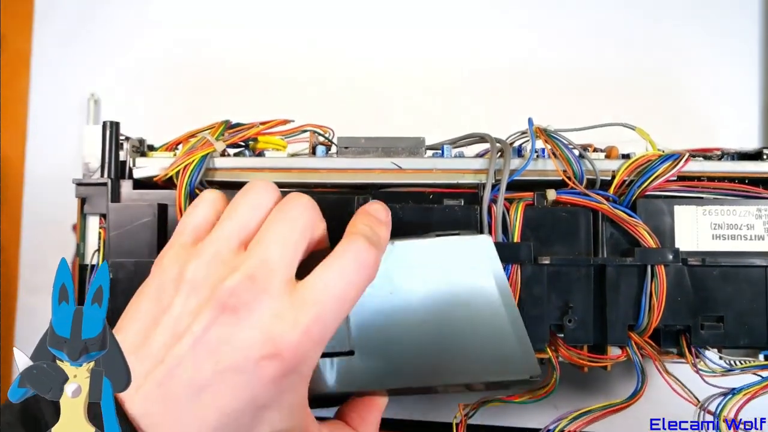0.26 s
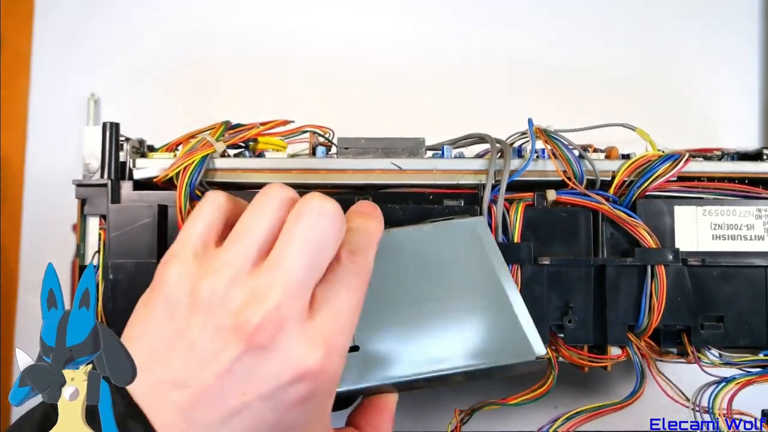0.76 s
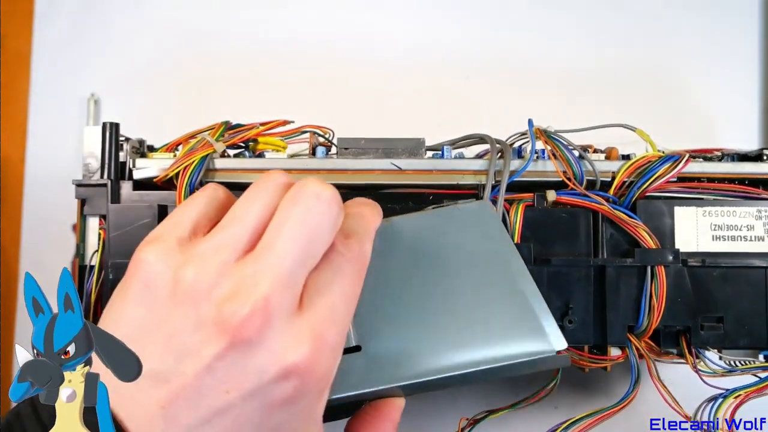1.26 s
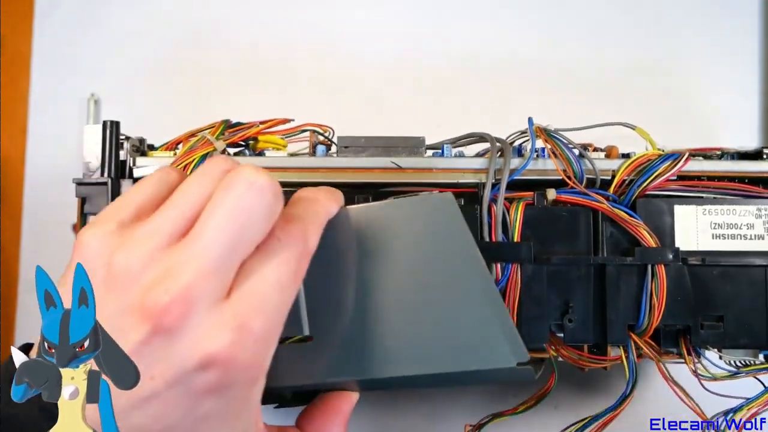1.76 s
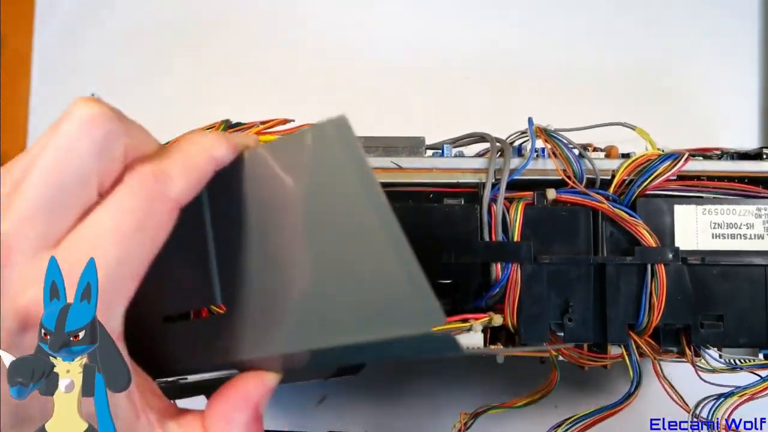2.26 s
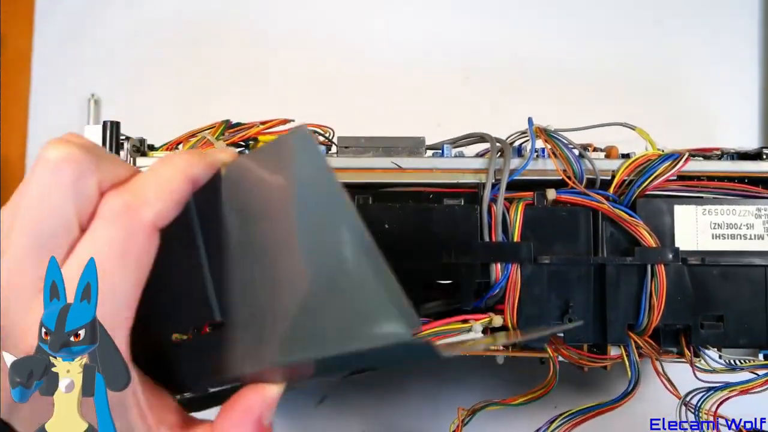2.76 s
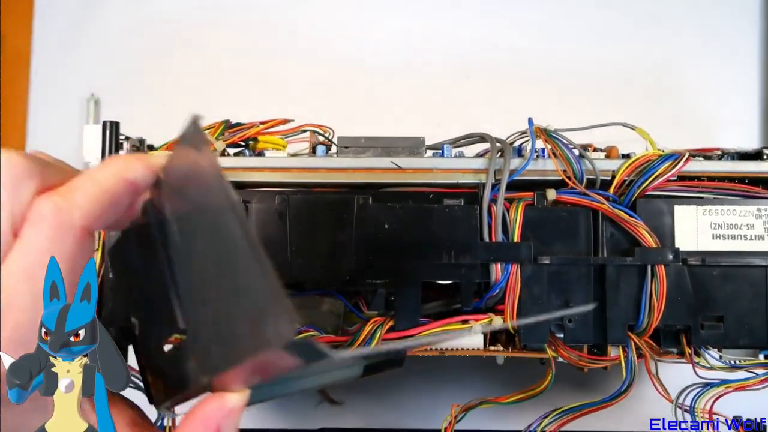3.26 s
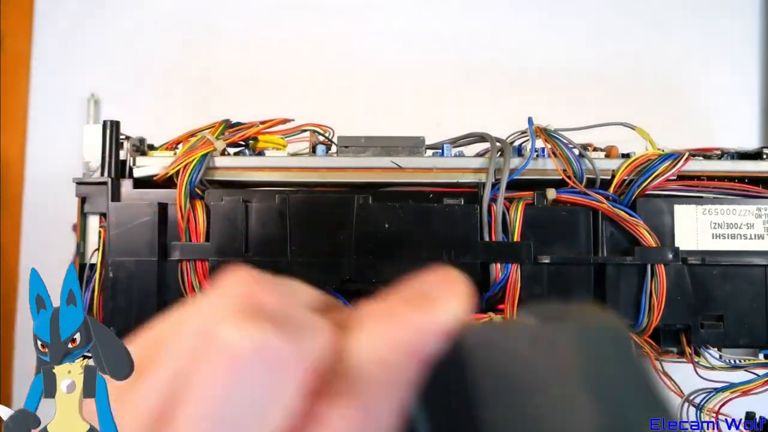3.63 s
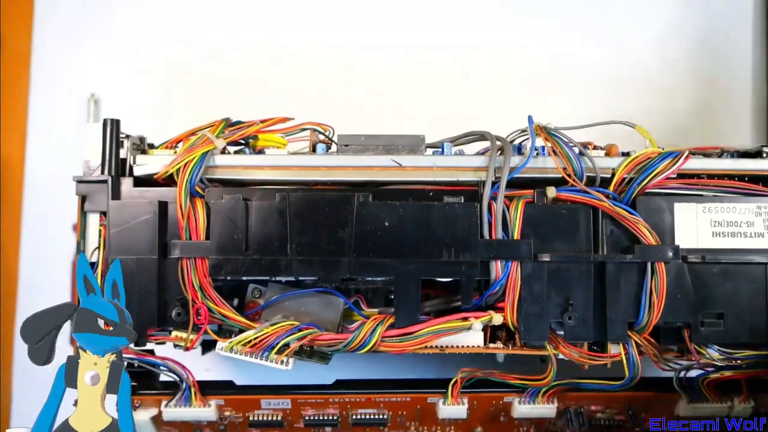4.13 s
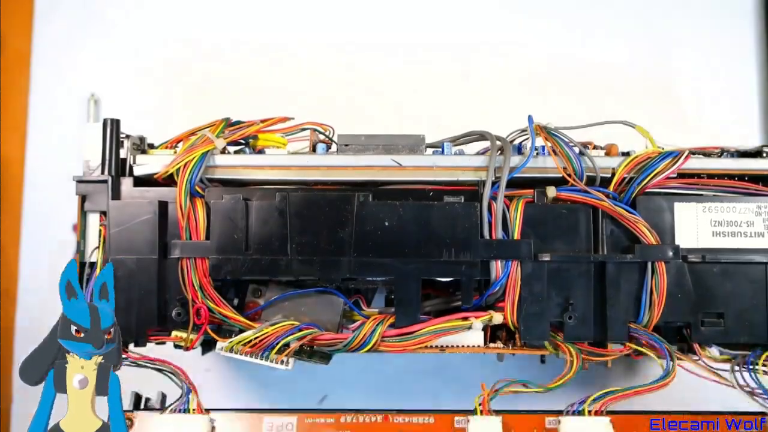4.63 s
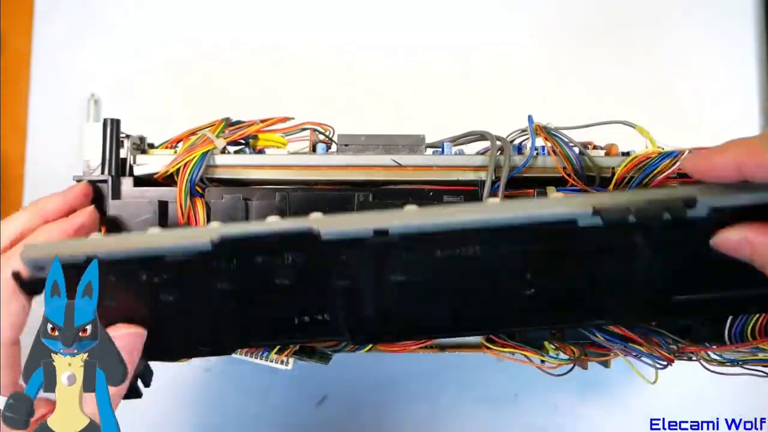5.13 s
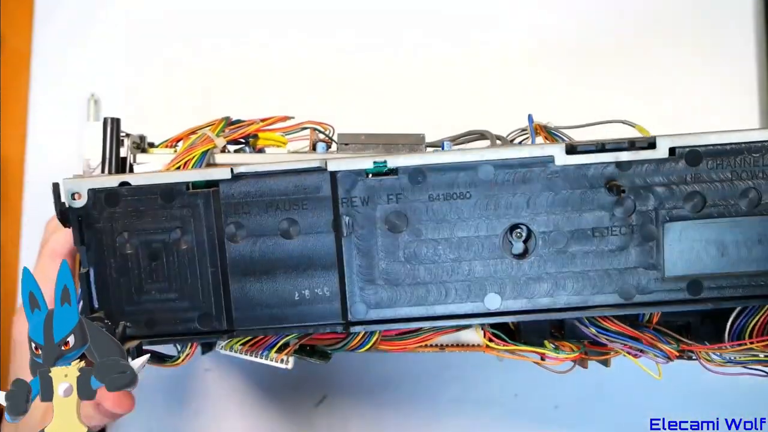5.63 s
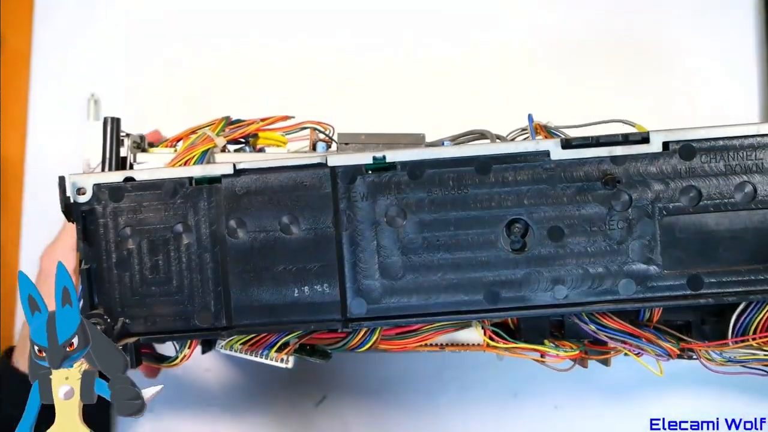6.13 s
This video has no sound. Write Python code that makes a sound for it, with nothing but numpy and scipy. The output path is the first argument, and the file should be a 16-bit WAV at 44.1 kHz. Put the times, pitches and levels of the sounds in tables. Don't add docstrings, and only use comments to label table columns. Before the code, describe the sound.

Hollow plastic knocks, clicks and rattles as a sheet-metal cover is worked loose, then a loud scraping clatter on a table and lighter handling.

```python
import sys
import numpy as np
from scipy import signal
from scipy.fft import rfft, irfft, next_fast_len
from scipy.io import wavfile
from scipy.ndimage import uniform_filter1d

SR = 44100
rng = np.random.default_rng(int(sys.argv[2]) if len(sys.argv) > 2 else 0)


def output_pcm(signal):
    pcm = np.clip(np.atleast_2d(signal).T, -1, 1) * 32767
    wavfile.write(sys.argv[1], SR, np.round(pcm).astype(np.int16))


def attenuation_scalar(level_db):
    decades = np.asarray(level_db, float) / 20
    return 10 ** decades


N = 281754

# hz, level_db_per_hz
HUSH_COLOUR = [(18, -28.5), (30, 7.5), (287, -3), (328, -2), (384, -4), (554, -6), (684, -7.5), (937, -2.5),
               (1810, -13.5), (2120, -10), (3060, -13.5), (4700, -16), (6000, -22), (16000, -40)]
HUSH_DB = -65
# hz, t60_s
ROOM_T60 = [(100, 0.51), (500, 0.2), (2000, 0.13), (6000, 0.12), (14000, 0.16)]
# hz, scatter_rad
SPREAD = [(100, 0.24), (300, 0.1), (700, 0.2), (2000, 1.19), (5000, 0.68), (10000, 0.58)]
# hz, likeness_0_to_1
SAME = [(100, 0.69), (400, 1), (1000, 0.99), (2500, 0.27), (5000, 0.11), (8000, 0.88), (14000, 0.72)]
# time_s, left_lag_samples
LAG = [
    (0, -2.5),
    (3.4, -3.5),
    (3.9, 11.5),
    (6.39, 4),
]
# time_s, left_over_right_db
LEAN = [
    (0, 0),
    (.6, 0.5),
    (3.3, 1.2),
    (3.6, 0),
]
SHUT_AT_S = [1.085, 1.33, 2.125, 2.315, 2.6, 3.2, 3.362, 3.648, 3.98, 5.33, 5.718, 6.282]
OPEN_AT_S = [1.118, 1.468, 2.186, 2.348, 2.632, 3.23, 3.522, 3.89, 4.01, 5.421, 6.089, 6.374]
GATE_DB = 14.5

# hz, width_hz, level_db
TABLE_MODES = [(55.1, 11, 3), (112, 54, -1.5), (174, 29, -5.5), (211, 15, -8.5), (269, 7.1, -9)]
# start_s, peak_db, low_mode_hz
THUMPS = [(0.027, -30.5, 101), (0.203, -18, 58.6), (.414, -18.5, 196), (.549, -16.5, 270),
          (0.765, -17, 190), (.899, -25.5, 114), (1.469, -36, 279), (1.661, -29, 85), (2.183, -26.5, 99),
          (2.639, -31.5, 89), (2.892, -25, 61.5), (3.02, -23, 174.5), (3.235, -28, 182),
          (3.523, -30.5, 114.5), (4.047, -7.5, 281), (4.088, -12, 340), (4.199, -14, 212),
          (4.233, -15, 400), (4.284, -15, 400), (4.3, -21, 283), (4.449, -21, 280), (5.172, -22.5, 275),
          (5.21, -33.5, 56.3), (5.538, -30, 115.3), (6.093, -34.5, 92), (6.377, -29.5, 118),
          (1.901, -34, 55), (3.895, -35.5, 60), (5.425, -31, 55), (6.17, -39, 151)]

# start_s, hardest_s, end_s, pressure_db, brightness_db
RUBS = [(0., 0.458, 0.8, -41.5, -10.5), (.7, 0.93, 1.08, -35, -11), (1.121, 1.15, 1.52, -38.5, -15),
        (1.47, 1.684, 4.4, -41.5, -11), (2.34, 2.443, 2.57, -38, -12), (2.639, 2.86, 3.3, -43, -11),
        (4.36, 4.44, 4.61, -33.5, -9), (4.685, 5.045, 5.2, -41, -11), (5.2, 5.29, 5.405, -48, -3.5),
        (5.41, 5.496, 5.74, -49, -13), (5.74, 5.78, 6.085, -52, -8), (6.09, 6.2, 6.6, -48, -9.5)]
# hz, level_db_per_hz
RUB_COLOUR = [(150, -43.5), (250, -21.5), (348, -10), (547, -14.5), (1010, -3), (1160, -9.5), (1400, -7.5),
              (5000, -27), (9000, -35.5), (12500, -43.5), (16000, -54)]
RUB_RISE_DB, RUB_FADE_DB, RUB_RUMBLE_DB = -0.5, -17, -10
# time_s, pressure_db, brightness_db
DRAG = [
    (4.008, -16.5, -18),
    (4.045, -14.5, -10.5),
    (4.09, -14.5, -10),
    (4.136, -12, -24),
    (4.182, -16.5, -2),
    (4.27, -14, -13),
    (4.312, -21.5, -7.5),
    (4.352, -31, 1.5),
    (4.4, -50, -13),
]
# hz, level_db_per_hz
DRAG_COLOUR = [(88, -40.5), (150, -19), (348, 0), (504, -8), (730, -8), (2100, -12), (4000, -19),
               (5790, -26), (8730, -34), (13200, -48.5), (16000, -57.5)]
DRAG_RUMBLE_DB = -15

# struck_s, hz, level_db, t60_s
COVER = [(2.996, 1972, -22.5, 0.25), (3.05, 319, -34.5, 0.45), (3.07, 2283, -36, 0.43),
         (3.07, 2196, -36, 0.22), (3.06, 448, -39, 0.33), (3.232, 2180, -44.5, 0.39),
         (3.232, 2335, -33, .3), (3.232, 1980, -34, .15), (3.232, 2767, -44, 0.42), (3.231, 2760, -31, 0.2),
         (3.232, 2227, -41, 0.4), (3.232, 325, -34, 0.43), (3.233, 430, -43.5, 0.43),
         (3.896, 346.4, -31, 0.2), (3.896, 449, -31.5, 0.26), (3.896, 717, -40, 0.19),
         (5.6, 2170, -57, 2.5), (4.3, 342.7, -24, 0.45), (4.33, 682, -30, .5), (4.448, 347, -35, 1.34),
         (5.22, 5780, -51, 0.57), (5.199, 3350, -45, 0.55), (5.43, 5700, -52, 0.6)]
# struck_s, hz, level_db, t60_s
PANELS = [(.023, 2550, -19, 0.03), (.023, 1380, -19.5, 0.058), (.085, 3430, -25.5, 0.029),
          (.163, 2910, -30, 0.043), (.208, 1567, -9, 0.038), (.237, 4550, -22, .03), (.283, 2000, -24, .05),
          (.286, 4070, -23, 0.026), (.793, 554, -13, 0.095), (1.12, 468, -12.5, 0.038),
          (1.12, 1060, -6, 0.03), (1.155, 1250, -29, 0.03), (1.47, 1009, -7.5, 0.037),
          (1.47, 1487, -10, 0.059), (1.472, 2012, -15, 0.065), (2.938, 771, -21.5, 0.11),
          (2.94, 2170, -23.5, 0.053), (3.052, 3550, -23.5, .08), (3.072, 3350, -31, 0.054),
          (3.025, 3490, -24, .05), (4.448, 352, -4.5, .04), (4.176, 3440, -16.5, .03),
          (4.306, 5100, -20.5, 0.11), (4.045, 8710, -15.5, 0.049), (.77, 3240, -18.5, .04),
          (.77, 6300, -24, .05), (.77, 7900, -26, .03), (.792, 3200, -18, .04), (.792, 6270, -20, .12),
          (.792, 5210, -24, .1), (.84, 2050, -29.5, .15), (3.07, 6590, -34, .15), (3.07, 6890, -33.5, .15),
          (3.075, 5448, -40.5, .14), (3.075, 7359, -41, .2), (2.94, 4530, -24, .08), (3.0, 4500, -24, .08),
          (4.9, 4560, -41, .04), (.68, 950, -32, .04), (3.028, 3930, -29, .08), (4.043, 4050, -22.5, .15),
          (4.306, 4095, -18, .1), (4.306, 6445, -27.5, .15), (3.24, 6700, -44, .15)]
FUZZ = 0.89

# start_s, catch_peak_db, pitch_hz, crack_db, slip_peak_db
SLIPS = [(1.12, -10, 1140, -10.5, -23), (1.47, -4.5, 1028, -12.5, -4), (1.721, -17.5, 1014, -12, -15),
         (1.768, -16, 980, -10.5, -12.5), (1.852, -23, 1020, -23, -21.5), (2.387, -21.5, 1030, -20, -25),
         (2.413, -19, 980, -19, -27), (2.444, -15, 987, -12, -13), (2.483, -24.5, 1060, -22, -24),
         (2.656, -25, 896, -13, -21), (2.939, -13.5, 915, -15.5, -12.5), (4.448, -14.5, 603, -34, -30),
         (4.553, -16, 980, -20, -26), (4.688, -24, 900, -19, -21), (4.766, -21.5, 987, -6, -17.5),
         (4.8, -26.5, 905, -45, -20.5), (4.859, -26.5, 1010, -30, -30), (4.899, -28, 985, -16, -18),
         (5.041, -16.5, 888, -11.5, -14.5), (5.102, -18, 922, -5, -10), (5.129, -17, 986, -13.5, -17),
         (5.441, -22.5, 1245, -18, -14.5), (5.602, -30, 1145, -23, -9.5), (6.167, -24.5, 2250, -21.5, -15)]
# start_s, peak_db, crack_db
TAPS = [(.051, -21, -19), (0.0843, -16, -13.5), (0.433, -16, -17), (.713, -15, -23), (1.01, -23.5, -25),
        (1.179, -20.5, -16.5), (1.506, -15.5, -17), (1.629, -22, -16), (1.95, -17, -19),
        (2.008, -24, -13.5), (2.187, -18, -23), (2.2, -24.5, -25), (2.349, -22.5, -23), (4.839, -25, -41.5),
        (4.955, -25.5, -7.5), (6.234, -36, -9)]
HOLLOW_HZ = 956
# start_s, peak_db, main_mode_hz, crack_db
KNOCKS = [(.022, -12, 1390, -18.5), (.235, -9.5, 492, -25), (.364, -5, 1060, -24.5),
          (.415, -13, 504, -21.5), (.792, 2.5, 1728, -20), (.805, -9, 559, -36), (.968, -16.5, 1105, -19),
          (1.154, -25, 430, -17), (1.662, -10, 1703, -25), (2.114, -60, 2716, -24),
          (2.633, -22.5, 350, -17), (2.704, -27.5, 1270, 10), (2.869, -19, 1340, -32.5),
          (3.024, -8, 3000, -4.5), (3.072, -12.5, 1200, 1), (4.014, -11, 354, -20.5),
          (4.14, -6.5, 3410, -6.5), (4.176, -4, 716, -21.5), (4.415, -9, 770, -17.5),
          (5.158, -21.5, 1510, -12), (5.181, -13.5, 890, -29.5), (5.428, -22, 1080, -32),
          (6.091, -23, 570, -15.5), (6.287, -39, 845, -27), (6.377, -25.5, 1740, -25)]
# start_s, peak_db, main_mode_hz, crack_db
CLATTERS = [(.284, -20, 1930, -14.5), (.5, -22.5, 1250, -18), (.736, -13, 1130, -21.5),
            (.771, -7.5, 1060, -16), (1.231, -26.5, 404, -36), (1.885, -19, 1355, -22.5),
            (3.053, -13, 3330, -4.5), (3.231, -14.5, 1144, -0.5), (3.894, -24, 703, -18.5),
            (4.044, -3, 446, -11), (4.305, -3, 1277, -13), (4.494, -19, 793, -11), (5.079, -19, 830, -14),
            (5.53, -19, 890, -15)]
# start_s, peak_db, main_mode_hz, crack_db
SCUFFS = [(.108, -30, 1104, -28), (.135, -38, 1090, -27), (.19, -24.5, 1200, -27.5), (.203, -5, 980, -14),
          (.3, -24.5, 2040, -9), (.32, -28.5, 2060, -12.5), (.476, -23.5, 533, -15.5),
          (.52, -20, 1243, -15.5), (.546, -13.5, 1160, -27.5), (.659, -31, 955, -27),
          (.703, -21.5, 910, -22.5), (.755, -14.5, 1092, -17.5), (.887, -15, 667, -16),
          (.91, -11.5, 446, -27), (1.042, -32.5, 1060, -24), (2.374, -27.5, 1010, -17),
          (2.398, -24.5, 1026, -16), (2.425, -24, 985, -15), (2.457, -20, 1074, -16.5),
          (2.68, -31, 940, -27), (2.768, -31.5, 1010, -12), (2.78, -23, 957, -12.5), (2.84, -31, 956, -24),
          (2.903, -26.5, 1000, -17), (2.965, -14.5, 880, -14.5), (4.19, -8.5, 715, -9.5),
          (4.215, -5.5, 509, -23.5), (4.28, -10, 441, -15), (4.325, -9, 1306, -17.5),
          (4.435, -19, 715, -17), (4.503, -18, 878, -29.5), (5.42, -24, 1030, -22),
          (2.992, -10, 1500, -11.5), (.765, -5, 1199, -23)]
# start_s, peak_db, main_mode_hz, crack_db
SNAPS = [(.022, -12.5, 2530, -16), (.363, -8.5, 4600, -10.5), (1.12, -3.5, 2130, -14),
         (1.487, -10, 5150, -6.5), (4.011, -4, 1223, -14), (4.141, -3, 3180, -10.5), (4.182, -5, 1220, -21),
         (4.306, -8, 4320, -6), (2.45, -18.5, 2110, -9), (2.871, -18.5, 2030, -32),
         (.208, -6.5, 4650, -9.5), (.549, -9, 1200, -18), (.704, -29.5, 7070, -8.5), (.77, -7.5, 3140, -9),
         (.792, -7.5, 6310, -8.5), (.892, -12.5, 3497, -9), (2.94, -15.5, 4490, -17.5),
         (4.145, -13, 8000, -6), (4.176, -9.5, 4100, -11.5), (4.436, -19, 4500, -13),
         (4.765, -22.5, 3170, -5.5), (5.046, -15, 4020, -9.5), (5.13, -18.5, 2850, -17),
         (5.537, -23, 3450, -19), (4.722, -36, 2840, -12)]
KNOCK_MS, CLATTER_MS, TAP_MS = 7.93, 15, 7.4
SLIP_MS, SCUFF_MS, SNAP_MS = 8.4, 8.7, 1.5
SLIP_CLICK_DB, SCUFF_CLICK_DB = -9.5, -26.5
HARD_RISE, SLIP_RISE, SCUFF_RISE = 0.28, 0.47, 0.94
# hz, level_db_per_hz
KNOCK_COLOUR = [(120, -35), (200, -2.5), (538, -2.5), (683, -5.5), (1020, -2.5), (1560, -4.5), (1770, -5),
                (2750, -6), (3130, -7.5), (5840, -15.5), (6280, -15.5), (15100, -36), (16000, -54)]
# hz, width_hz, level_db
CHASSIS_MODES = [(636, 13, -2.5), (1060, 660, 1.5), (1270, 41, 3.5), (1780, 91, -1.5), (2850, 46, -8.5),
                 (4720, 230, -2.5), (5100, 20, -8.5), (7230, 200, -13)]
CRACK_S, CRACK_LEFT = .006, .45


def evened(x):
    return x / np.sqrt(np.mean(x ** 2) + 1e-20)


def read(points, hz):
    f, value = np.transpose(points)
    return np.interp(np.log(hz + 1), np.log(f + 1), value)


def mode(hz, centre_hz, width_hz):
    return 1j * hz * width_hz / (centre_hz ** 2 - hz ** 2 + 1j * hz * width_hz)


def lagged(hz, samples):
    return np.exp(-2j * np.pi * hz * samples / SR / (1 + (hz / 4500) ** 4))


def placed(starts_s, sounds):
    out = np.zeros((2, N))
    for start_s, sound in zip(starts_s.ravel(), sounds.transpose(1, 0, 2)):
        part = out[:, max(round(start_s * SR), 0):][:, :sound.shape[1]]
        part += sound[:, :part.shape[1]]
    return out


def hush():
    frames, hz = N // 256 + 5, np.fft.rfftfreq(1024, 1 / SR)
    a, b, c, d, patches = rng.standard_normal((frames, 513, 5)).T
    patches = evened(uniform_filter1d(uniform_filter1d(patches, 4, 0), 40, 1))
    shared, own = a + 1j * b, c + 1j * d
    z = np.array([shared, 0.99 * shared + 1.04 * own])
    z *= attenuation_scalar(read(HUSH_COLOUR, hz)[:, None] + 2.2 * patches)
    noise = signal.istft(z, nperseg=1024, noverlap=768)[1][:, :N]
    return attenuation_scalar(HUSH_DB + GATE_DB) * evened(noise)


def room(x):
    taps = np.zeros((2, SR // 2))
    at = np.arange(100, SR // 2 - 20, 20)
    at = at + rng.integers(0, 20, (2, len(at)))
    np.put_along_axis(taps, at, rng.choice([-1., 1.], at.shape), 1)
    hz, t, z = signal.stft(taps, SR, nperseg=256)
    same = np.clip(read(SAME, hz) - .15, 0, 1)[:, None]
    z = np.array([z[0], same * z[0] + np.sqrt(1 - same ** 2) * z[1]])
    decay = attenuation_scalar(-60 * t / read(ROOM_T60, hz)[:, None])
    tail = signal.istft(z * decay, SR, nperseg=256)[1]
    return signal.fftconvolve(x, tail / np.linalg.norm(tail[0]), axes=1)[:, :N]


def thumps():
    start_s, db, low_hz = np.transpose(THUMPS)[:, :, None]
    size = 16384
    t, hz = np.arange(size) / SR, np.fft.rfftfreq(size, 1 / SR)
    uneven_db = 3.0 * rng.standard_normal((len(start_s), len(TABLE_MODES)))
    push = rfft(np.exp(-t / 0.0017) * (1 - np.exp(-t / 0.00057)))
    ring = mode(hz, low_hz, 0.22 * low_hz + 8)
    for k, (mode_hz, width_hz, mode_db) in enumerate(TABLE_MODES):
        ring = ring + attenuation_scalar(mode_db - 7.5 + uneven_db[:, k, None]) * mode(hz, mode_hz, width_hz)
    left = attenuation_scalar(-9.0 / (1 + (hz / 70) ** 2))
    sound = irfft(push * ring * np.array([left, np.ones_like(left)])[:, None])
    sound = attenuation_scalar(db) * sound / abs(sound[1]).max(1, keepdims=True)
    return placed(start_s, sound[:, :, :9000])


def ports(mono, scatter):
    hz, t, z = signal.stft(mono, SR, nperseg=256)
    drift = rng.standard_normal(z.shape)
    drift = evened(uniform_filter1d(uniform_filter1d(drift, 4, 0), 9, 1))
    turn = np.exp(.5j * scatter * read(SPREAD, hz)[:, None] * drift)
    left = z * turn * lagged(hz[:, None], np.interp(t, *np.transpose(LAG)))
    return signal.istft(np.array([left, z / turn]), SR, nperseg=256)[1][:, :len(mono)]


def stroke(start_s, hardest_s, end_s, db, bright_db):
    eases = ((start_s, RUB_RISE_DB), (hardest_s, 0), (end_s, RUB_FADE_DB))
    return [(s, db + ease_db, bright_db, RUB_RUMBLE_DB) for s, ease_db in eases]


def friction(strokes, colour, slips_per_s, spread_db, smooth, clump_db, body_modes):
    rows = []
    for points in map(np.array, strokes):
        first_s, _, first_bright_db, first_rumble_db = points[0]
        last_s, _, last_bright_db, last_rumble_db = points[-1]
        rows.append((first_s, -95.0, first_bright_db + 3.0, first_rumble_db - 4.0))
        rows.extend(points)
        rows.append((last_s, -95.5, last_bright_db + 10.5, last_rumble_db - 5.0))
    rows = np.array(rows)
    t = np.arange(N) / SR
    db, bright_db, rumble_db = (np.interp(t, rows[:, 0], column) for column in rows[:, 1:].T)

    clumps = attenuation_scalar(clump_db * evened(uniform_filter1d(rng.standard_normal(N), 500)))
    sizes = attenuation_scalar(spread_db * np.minimum(rng.exponential(1, N), 4))
    grains = sizes * (rng.random(N) < slips_per_s / SR) * rng.choice([-1, 1], N)
    size = next_fast_len(N)
    z = rfft((evened(grains) + smooth * rng.standard_normal(N)) * clumps, size)

    hz = np.fft.rfftfreq(size, 1 / SR)
    high = 1 / (1 + (3000 / (hz + 1)) ** 6)
    tint = attenuation_scalar(read(colour, hz))
    low = tint * (1 - high) * (1 + sum(attenuation_scalar(g) * mode(hz, f, w) for f, w, g in body_modes))
    rumble = sum(attenuation_scalar(g) * mode(hz, f, w) for f, w, g in TABLE_MODES)
    low, high, rumble = (evened(irfft(z * part, size)[:N]) for part in (low, tint * high, rumble))
    return attenuation_scalar(db) * (low + attenuation_scalar(bright_db) * high + attenuation_scalar(rumble_db) * rumble)


def rubbing():
    rub = friction([stroke(*row) for row in RUBS], RUB_COLOUR, slips_per_s=1500, spread_db=3.4,
                   smooth=1.0, clump_db=1.8, body_modes=[(920, 120, -7), (2050, 140, -3.5)])
    drag = friction([[(*row, DRAG_RUMBLE_DB) for row in DRAG]], DRAG_COLOUR, slips_per_s=600, spread_db=4.0,
                    smooth=0.5, clump_db=1.0,
                    body_modes=[(353, 47, -13.0), (1250, 110, 3.5), (980, 40, -6.5), (750, 110, -4.5)])
    return ports(rub + drag, 1.5) * attenuation_scalar(np.array([[-1.2], [1.2]]))


def ringing_modes(rows, size):
    struck_s, hz, db, t60_s = np.transpose(rows)[:, :, None]
    t = np.arange(size) / SR
    beat_phase, phase, apart = 2 * np.pi * rng.random((len(struck_s), 3)).T[:, :, None]
    decay = attenuation_scalar(db - 60 * t / t60_s) * (1 - np.exp(-t / 0.0012))
    flutter = rng.standard_normal((len(struck_s), size))
    flutter = evened(uniform_filter1d(uniform_filter1d(flutter, 150, 1), 150, 1))
    share = FUZZ / (1 + (3800 / hz) ** 8)
    beat = 1 + 0.2 * np.sin(2 * np.pi * 0.011 * hz * t + beat_phase)
    level = decay * beat * (1 - share + share * flutter)
    apart = 0.18 * read(SPREAD, hz) * (apart - np.pi)
    return placed(struck_s, level * np.sin(2 * np.pi * hz * t + np.array([phase, phase + apart])))


def slips():
    start_s, _, hz, _, db = np.transpose(SLIPS)[:, :, None]
    t = np.arange(3000) / SR
    waver = 1 + 0.4 * uniform_filter1d(rng.standard_normal((len(start_s), len(t))), 300, 1)
    turns = np.cumsum(hz * waver, 1) / SR
    progress = np.clip(t * (hz + 150) / 13.4, 0, 1)
    swell = np.sin(np.pi * progress ** 0.59) ** 2
    behind = np.interp(start_s, *np.transpose(LAG)) * hz / SR
    left = attenuation_scalar(-1.5) * np.sin(2 * np.pi * (turns - behind))
    right = np.sin(2 * np.pi * turns)
    return placed(start_s, attenuation_scalar(db - 6.0) * swell * np.array([left, right]))


def contacts():
    taps = [(start_s, db, HOLLOW_HZ, crack_db) for start_s, db, crack_db in TAPS]
    kinds = ((taps, TAP_MS, 0, HARD_RISE),
             (KNOCKS, KNOCK_MS, 0, HARD_RISE),
             (CLATTERS, CLATTER_MS, 0, HARD_RISE),
             (SLIPS, SLIP_MS, SLIP_CLICK_DB, SLIP_RISE),
             (SCUFFS, SCUFF_MS, SCUFF_CLICK_DB, SCUFF_RISE),
             (SNAPS, SNAP_MS, 0, HARD_RISE))
    return [(*row[:4], *touch) for rows, *touch in kinds for row in rows]


def knocks():
    start_s, db, main_hz, crack_db, rattle_ms, click_db, rise = np.transpose(contacts())[:, :, None]
    size = 6144
    t, hz = np.arange(size) / SR, np.fft.rfftfreq(size, 1 / SR)
    a, b, lumps, draw = rng.standard_normal((len(start_s), size, 4)).transpose(2, 0, 1)

    rattle_s = rattle_ms / 1000
    tick = np.minimum(0.0059 / rattle_s, 1.3) ** 2 * np.exp(-t / 0.0016)
    tick = 2.52 * attenuation_scalar(0.44 * np.minimum(db + 6.5, 0) + click_db) * tick
    burst = (1 - np.exp(-t / (rise * rattle_s))) * np.exp(-t / rattle_s)
    tail = 0.088 * np.exp(-t / (4 * rattle_s))
    shape = (tick + burst + tail) * (t < .12)
    shape = shape * attenuation_scalar(15.5 * uniform_filter1d(lumps, 40, 1))

    a, b = rfft(a * shape), rfft(b * shape)
    same = read(SAME, hz)
    lag = np.interp(start_s, *np.transpose(LAG))
    pair = np.array([a * lagged(hz, lag), same * a + np.sqrt(1 - same ** 2) * b])

    colour = attenuation_scalar(read(KNOCK_COLOUR, hz) + (crack_db + 18.5) / (1 + (3200 / (hz + 1)) ** 4))
    bumps = evened(uniform_filter1d(uniform_filter1d(draw, 150, 1), 150, 1))[:, :len(hz)]
    colour = colour * attenuation_scalar(2.5 * bumps)
    ring = 0
    for k, (mode_hz, width_hz, mode_db) in enumerate(CHASSIS_MODES):
        detuned_hz = mode_hz * (1 + 0.018 * draw[:, 50 + k, None])
        level = attenuation_scalar(mode_db * 0.043 + 2.6 * draw[:, k, None])
        ring = ring + level * mode(hz, detuned_hz, width_hz + 30)
    main = attenuation_scalar(3.5) * mode(hz, main_hz, 0.06 * main_hz + 70)
    pair = pair * (colour * (1 + 0.37 * ring) + main)

    treble = 1j * hz / (2500 + 1j * hz)
    treble_loss = (1 - CRACK_LEFT) * (1 - np.exp(-t / (CRACK_S + rattle_s)))
    body = irfft(pair) - irfft(pair * treble) * treble_loss
    body = body / abs(body).max((0, 2), keepdims=True)
    body = body * attenuation_scalar(np.array([-.5, 1.7]))[:, None, None]
    return placed(start_s, (attenuation_scalar(db + 0.5) * body)[:, :, :5400])


def scene():
    lean = attenuation_scalar(np.interp(np.arange(N) / SR, *np.transpose(LEAN)) * np.array([[.5], [-.5]]))
    near = (thumps() + rubbing() + knocks()) * lean
    hollow = slips() * lean
    sheet = ringing_modes(COVER, size=24000) + ringing_modes(PANELS, size=6000)
    reverb = attenuation_scalar(-6.0) * room(near + hollow + 0.66 * sheet)
    return hush() + reverb + sheet + hollow + near


def band_limit(x):
    return signal.sosfilt(signal.butter(12, 16450, fs=SR, output="sos"), x)


def record(dry):
    t = np.arange(N) / SR
    dry = signal.sosfilt(signal.butter(2, [38, 13000], "bandpass", fs=SR, output="sos"), dry)
    bass = signal.sosfilt(signal.butter(1, 60, fs=SR, output="sos"), dry)
    dry = dry + bass * np.array([[-.45], [.25]])

    shut = sum(np.clip((t - a) / 0.02, 0, 1) * (t < b) for a, b in zip(SHUT_AT_S, OPEN_AT_S))
    gate_db = -GATE_DB * uniform_filter1d(shut, 40)

    power_db = 10 * np.log10(abs(uniform_filter1d((dry ** 2).mean(0), 300)) + 1e-12)
    fall_db = t * 170.0
    held_db = np.maximum.accumulate(power_db + fall_db) - fall_db
    over_db = np.maximum(held_db + 14.5, 0)
    squeeze_db = -0.14 * uniform_filter1d(over_db, 100)

    rounded = np.tanh(dry * attenuation_scalar(gate_db + squeeze_db))
    mix = signal.oaconvolve(rounded, signal.firwin(401, 16400, fs=SR)[None], "same")
    return band_limit(mix)


dry = scene()
out = record(dry)
output_pcm(out)
```